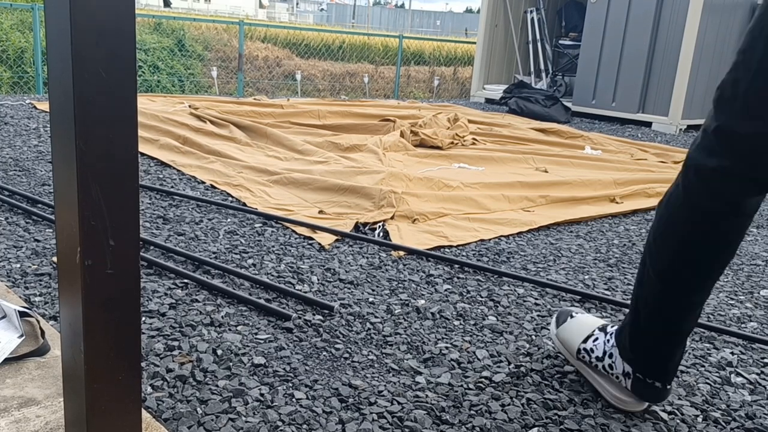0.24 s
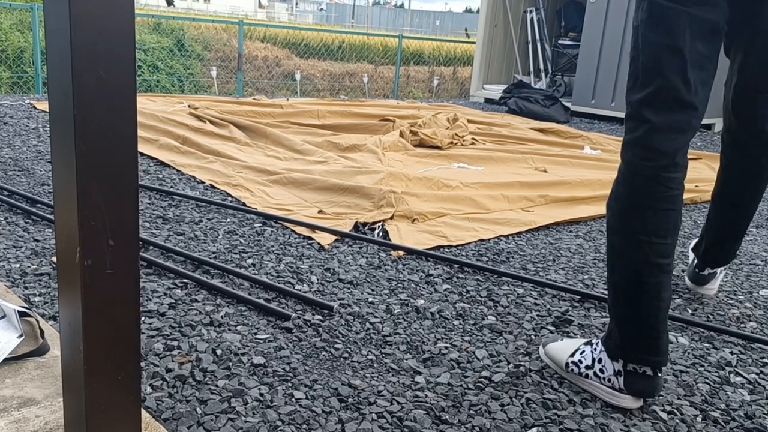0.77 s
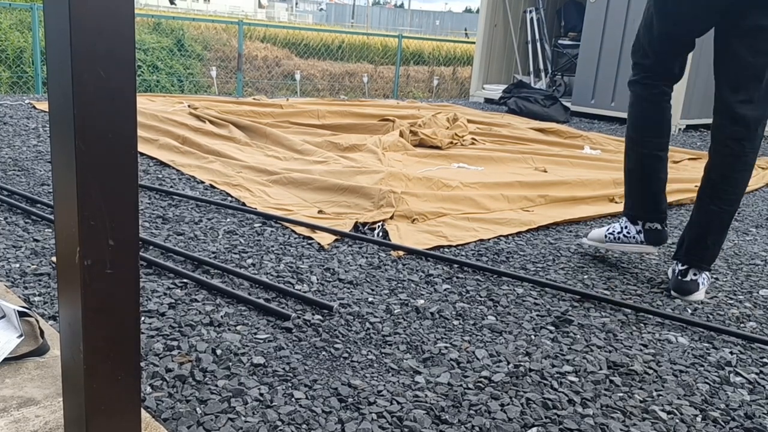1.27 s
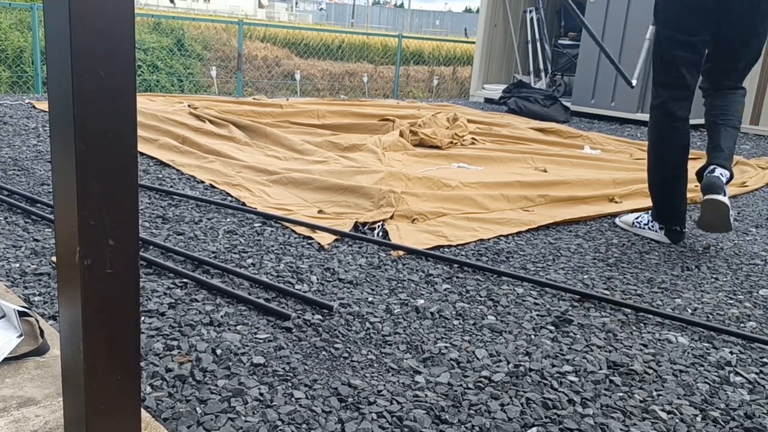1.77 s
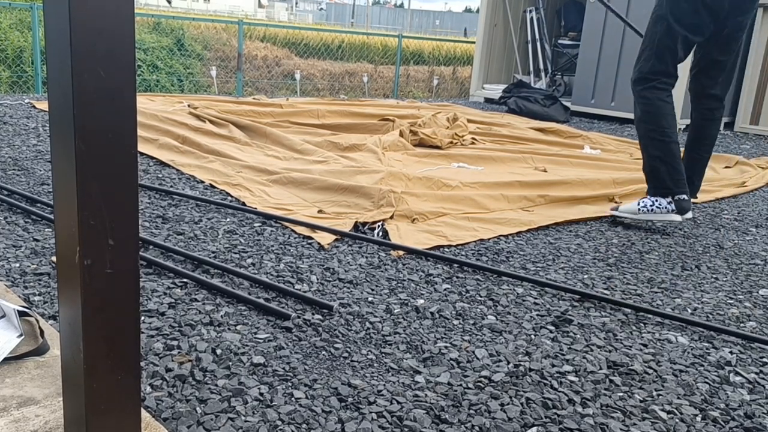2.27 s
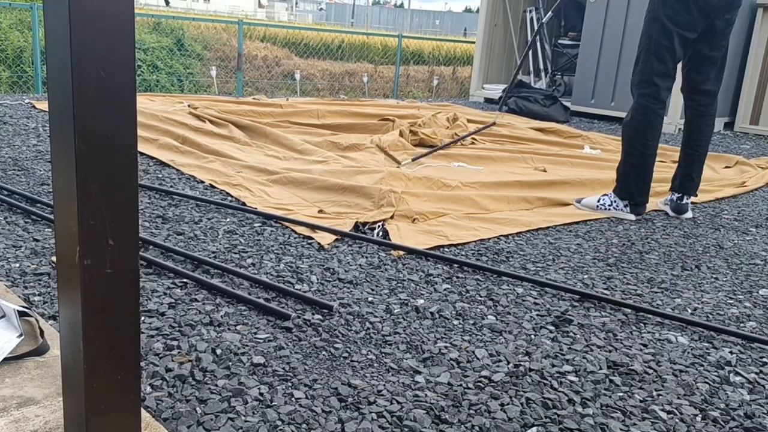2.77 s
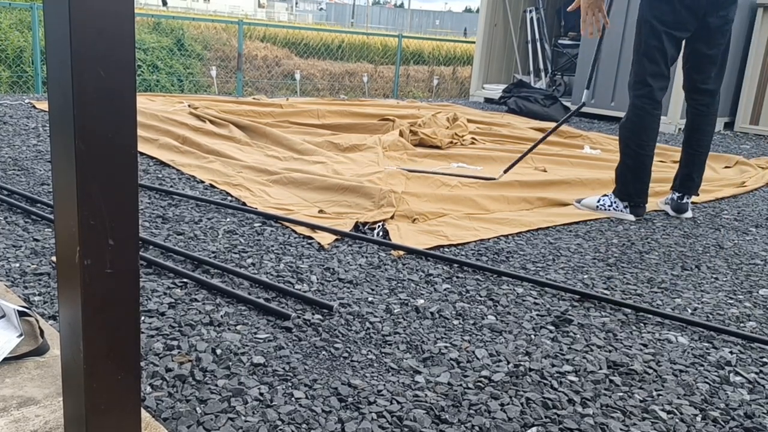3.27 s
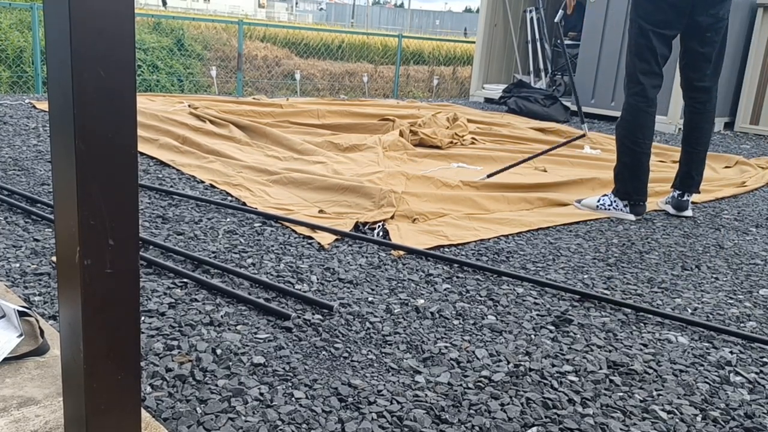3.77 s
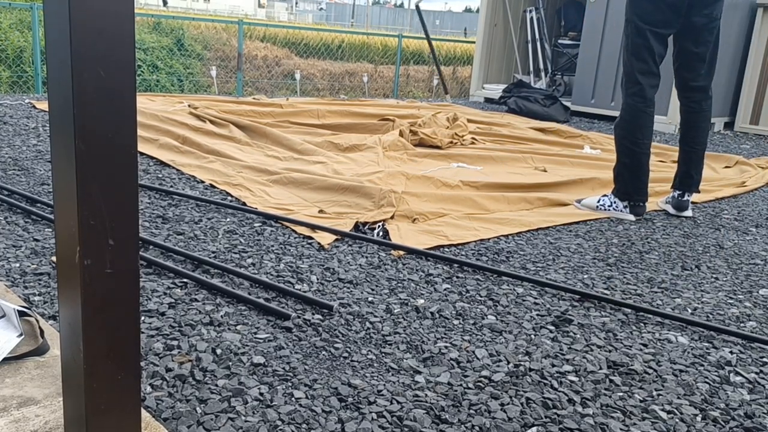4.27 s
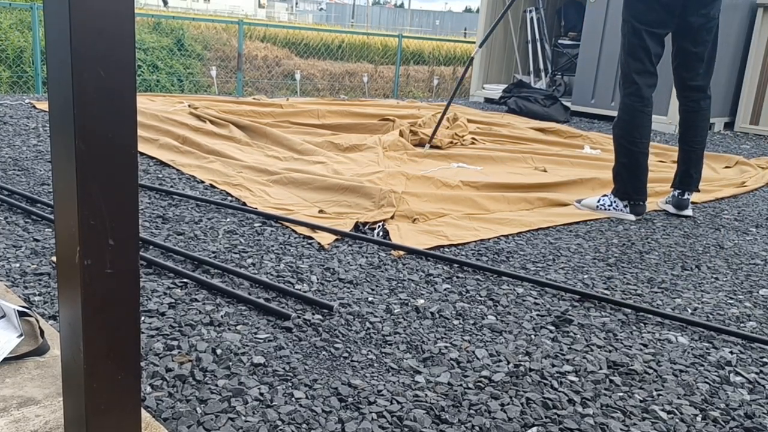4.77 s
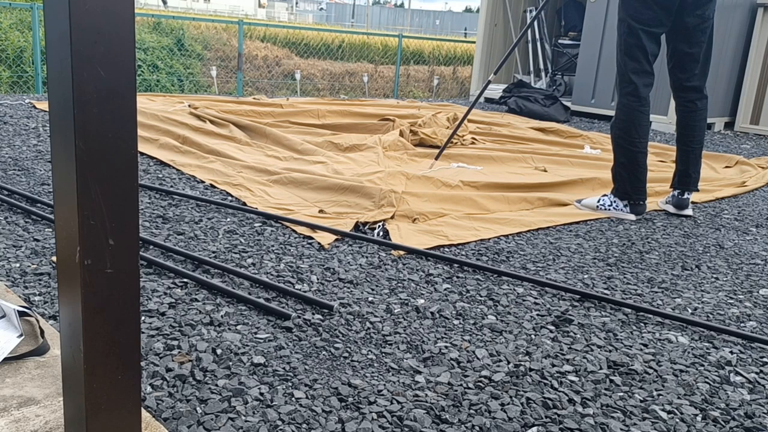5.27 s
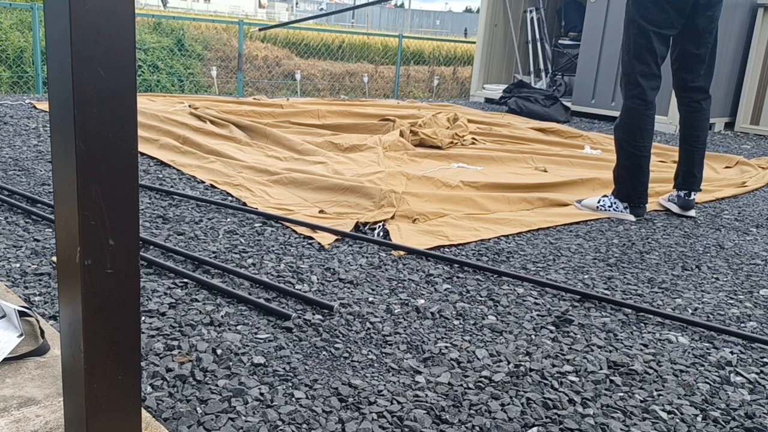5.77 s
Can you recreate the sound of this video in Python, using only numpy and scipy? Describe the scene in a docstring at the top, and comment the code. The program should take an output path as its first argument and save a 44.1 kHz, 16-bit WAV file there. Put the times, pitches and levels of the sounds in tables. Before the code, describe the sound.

Tent pole sections clack, rattle and briefly ring in an outdoor yard after a few light gravel steps, with a distant machine humming.

```python
"""Feet crunch and tick on gravel near the microphone, in a yard between sheds where a distant machine hums.
Further off, a folded tent pole is shaken out: its tube sections clack, rattle and ring briefly,
with a few dull thuds, and the walls throw each clack back as a short dense tail.
Gusts buffet the microphone ports, mostly the left, and the recorder turns down after the loudest blow."""
import sys
import numpy as np
from scipy import signal
from scipy.fft import rfft, irfft
from scipy.io import wavfile
from scipy.ndimage import uniform_filter1d

SR = 44100
rng = np.random.default_rng(int(sys.argv[2]) if len(sys.argv) > 2 else 0)


def persist_wave(psi):
    """Save psi, clipped to +-1, as 16-bit WAV."""
    counts = np.round(np.clip(psi, -1, 1) * 32767).astype(np.int16)
    wavfile.write(sys.argv[1], SR, np.atleast_2d(counts).T)


N = 265923


def amp(db):
    """Decibels to gain."""
    return 10 ** (np.asarray(db) / 20)


def rms_one(x):
    """Scale to unit rms."""
    return x / np.sqrt(np.mean(x ** 2) + 1e-20)


def at_hz(points, hz):
    """Read a table on a log-frequency axis."""
    points = np.array(points)
    return np.interp(np.log(hz), np.log(points[:, 0]), points[:, 1])


def band(x, low_hz, high_hz):
    """Butterworth band-pass."""
    sos = signal.butter(2, [low_hz, min(high_hz, SR / 2.2)], "band", fs=SR, output="sos")
    return signal.sosfilt(sos, x + 1e-18)


def causal_colour(spectrum):
    """Minimum-phase response of a spectrum, so that nothing sounds early; energy 1."""
    size = 4096
    hz = np.arange(size // 2 + 1) * SR / size + 1
    cepstrum = irfft(np.log(amp(at_hz(spectrum, hz))))
    cepstrum[1:size // 2] *= 2
    cepstrum[size // 2 + 1:] = 0
    response = irfft(np.exp(rfft(cepstrum)))
    return response / np.sqrt(np.sum(response ** 2))


def swell(peak_s, db, fall_s, rise_share):
    """Gain that climbs 20 dB in rise_share * fall_s to its peak, then drops 20 dB every fall_s."""
    since = np.arange(N) / SR - peak_s
    return amp(db - 20 * np.maximum(since, -since / rise_share) / fall_s)


def diffuse(shape):
    """White noise from all sides, alike at both microphones where the wavelength is long."""
    # left-right likeness of diffuse sound: frequency_hz, correlation
    likeness = [(60, 0.64), (250, 0.83), (600, 0.76), (1500, 0.054), (8000, 0.058)]
    mid, side = rfft(rng.standard_normal((2,) + shape))
    hz = np.arange(mid.shape[-1]) * SR / shape[-1] + 1
    alike = np.clip(at_hz(likeness, hz), 0, 1)
    mid, side = np.sqrt(1 + alike) * mid, np.sqrt(1 - alike) * side
    return irfft(np.array([mid + side, mid - side]), shape[-1])


def air_and_machine():
    """Far air and traffic, with the hum of a distant machine whose speed wanders a little."""
    # spectrum of the yard's air: frequency_hz, density_db
    air_spectrum = [(18, -42), (30, -23), (108, -4), (183, -7.5), (232, 1.5), (335, -3.5), (382, -5),
                    (471, -10.5), (645, -16.5), (775, -21), (1940, -29), (2460, -31.5), (4490, -36),
                    (8420, -33), (15800, -42.5)]
    hum_hz, harmonics = 76.76, [(1, -71), (2, -64.5), (3, -64.5), (5, -59.5)]   # multiple, level_db
    colour = causal_colour(air_spectrum)
    air = signal.fftconvolve(diffuse((N + SR,)), colour[None], axes=1)[:, SR:SR + N]
    wander = 0.0033 * np.cumsum(rng.standard_normal(N))
    phase = 2 * np.pi * hum_hz * np.arange(N) / SR + wander
    hum = sum(2 ** .5 * amp(db) * np.sin(k * phase) for k, db in harmonics)
    return amp(-53) * rms_one(air) + hum


def gravel():
    """Many stones grind under the sole: a dull crunch and a bright grit."""
    # weight shifts on the gravel: peak_s, crunch_db, fall_s, grit_offset_db
    treads = [(0.07, -63, 0.16, -8), (0.2, -61, 0.11, -8), (0.34, -39, 0.066, -4.5),
              (0.523, -62.5, 0.098, -2), (0.62, -82, 0.6, 8.5), (0.934, -55, 0.17, -9),
              (1.207, -65, 0.031, -25), (1.297, -73, 0.053, 20)]
    grains_per_s = 800
    slips = rng.random((2, N)) < grains_per_s / SR
    strength = amp(3.9 * np.minimum(rng.exponential(1, (2, N)), 5))
    grains = slips * strength * rng.choice([-1, 1], (2, N))
    crunch = rms_one(band(grains[0], 220, 2350))
    grit = rms_one(band(grains[1], 3000, 17000))
    return sum(swell(s, db, fall_s, rise_share=1) * (crunch + amp(grit_db + 1.5) * grit)
               for s, db, fall_s, grit_db in treads)


def ticks():
    """A stone under a sole or a joint snapping shut gives a millisecond of bright noise."""
    # sharp dry ticks: start_s, level_db, pitch_hz
    snaps = [(0.0556, -41.5, 5240), (0.2138, -41, 5300), (0.263, -44, 8380), (0.291, -45, 7650),
             (0.312, -34, 8500), (0.324, -43.5, 12700), (0.356, -39, 7500), (0.4255, -28, 7100),
             (0.437, -41, 14600), (0.447, -31, 14100), (0.8777, -40.5, 7100), (0.971, -40, 13100),
             (1.709, -26.5, 15000), (1.7234, -31, 11800), (1.8966, -29, 8600), (2.5723, -9, 11100),
             (2.7996, -9, 8310), (4.636, -19.5, 8100), (5.5217, -7.5, 7300)]
    length = SR // 100
    fade = np.exp(-np.arange(length) / SR / 0.0012)
    out = np.zeros(N)
    for s, db, hz in snaps:
        tick = band(rng.standard_normal(length) * fade, hz / 2.1, hz * 1.6)
        start = round(s * SR)
        out[start:start + length] += amp(db + 2.5) * tick / np.max(np.abs(tick))
    return out


def ring(force, hz, t60):
    """One mode driven by a force; gain 1 at resonance."""
    r = amp(-60 / (t60 * SR))
    feedback = [1, -2 * r * np.cos(2 * np.pi * hz / SR), r * r]
    return signal.lfilter([(1 - r * r) / 2, 0, (r * r - 1) / 2], feedback, force + 1e-18)


def tent_pole():
    """Each knock is a burst of uneven contacts that drives a broad clack and the tube's modes."""
    # sections knocking together: start_s, clack_db, ring_db, hardness_db (gain per mode group upward),
    # lowest_mode_db (often damped by a hand or the cord), rattle_s
    knocks = [(0.4614, -46, -59, -5.5, -57, 0.016), (0.537, -34, -51.5, -4, -53, 0.011),
              (0.6629, -40, -57.5, -4.5, -60, 0.0078), (1.2315, -46, -71, -1, -76, 0.0052),
              (1.2767, -36.5, -65, -7, -59, 0.0031), (1.4327, -25, -43.5, -2, -45, 0.0076),
              (1.558, -17, -36, -0.5, -46, 0.0025), (1.7566, -39, -57.5, -0.5, -80, 0.0023),
              (1.9151, -20, -38, 3, -41, 0.0061), (2.026, -56, -60, -1, -35, 0.019),
              (2.0484, -45.5, -53, -5.5, -42.5, 0.028), (2.2097, -63, -55, 1, -40, 0.011),
              (2.2304, -46, -54.5, -4, -50, 0.013), (2.39, -19, -34.5, 3, -54.5, 0.012),
              (2.5695, -20.5, -40, -4, -49.5, 0.0034), (2.684, -37, -52, -1, -60.5, 0.015),
              (2.7316, -31.5, -53, -6, -55.5, 0.0063), (2.7761, -16, -31, 2, -34, 0.012),
              (2.7987, -6.5, -31, 6.5, -37.5, 0.0092), (2.8328, -13, -28, 3, -67, 0.0036),
              (3.0505, -46, -63, -5, -69, 0.0054), (3.1904, -48, -63, 1.5, -84, 0.01),
              (3.457, -47.5, -60, -0.5, -79, 0.013), (3.568, -63, -61, 1, -81, 0.01),
              (3.6506, -38, -44.5, -1, -72, 0.018), (3.6707, -18, -52, 5.5, -75, 0.0035),
              (3.7967, -43, -52.5, -5.5, -38, 0.0029), (3.827, -33.5, -40, -2.5, -42, 0.0066),
              (3.8584, -27, -42.5, 3, -70, 0.0048), (4.1066, -59.5, -61, 1.5, -68, 0.0025),
              (4.156, -68, -72, -6.5, -68, 0.0065), (4.2971, -30, -47.5, -1, -66, 0.013),
              (4.4435, -34, -63, 0, -52, 0.008), (4.489, -37.5, -60, 2, -57, 0.027),
              (4.5296, -32, -42.5, -0.5, -65, 0.0019), (4.5804, -37.5, -45, -2, -45, 0.002),
              (4.637, -14.5, -35, 3.5, -53, 0.0027), (4.697, -43, -52, -4.5, -48, 0.005),
              (4.842, -42, -47.5, -4, -50, 0.0019), (4.9117, -47, -56.5, -2.5, -52, 0.013),
              (5.1114, -51, -51.5, -4.5, -48, 0.017), (5.1365, -34, -46, -2, -52, 0.0068),
              (5.1619, -36, -59, 4.5, -55, 0.0091), (5.206, -35.5, -58, 2, -74, 0.0047),
              (5.2294, -54, -66, -1.5, -73, 0.0071), (5.5212, -17.5, -30, 2, -52, 0.012),
              (5.7677, -49, -80, 0, -62, 0.0067)]
    # bending modes in groups, split as the sections differ slightly and damped by the cord inside:
    # pitch_hz, level_db, t60_s
    tube_modes = [
        [(1218, 5.5, 0.037)],
        [(2160, 1, 0.036), (2334, 0, 0.0097), (3254, -5, 0.0062), (3487, 0, .012)],
        [(5050, 0, 0.013), (5190, -1, 0.012)],
        [(7250, 0.5, 0.024), (7020, -4, 0.0093)],
        [(8190, 5.5, 0.035), (8335, 2.5, 0.015), (9070, -8, 0.027)],
    ]
    # spectrum of the clack: frequency_hz, density_db
    clack_spectrum = [(290, -19), (500, -28.5), (986, -16), (2250, -1.5), (4690, 3.5), (5190, 9),
                      (6180, -18), (6830, -2.5), (7670, -10.5), (8490, -2.5), (9390, -6), (15100, -9),
                      (15800, -15.5)]
    length, upper_groups = SR // 5, len(tube_modes) - 1
    t = np.arange(length) / SR
    shape = (len(knocks), length)
    contacts = rng.standard_normal(shape) * amp(3.6 * rng.exponential(1, shape))
    # each knock lands elsewhere on the tube and favours other modes
    scatter_db = 4.5 * rng.standard_normal((len(knocks), upper_groups))
    rank = np.arange(upper_groups) - 1.5
    force = np.zeros((2 + len(tube_modes), N + length))
    for knock, touch, chance_db in zip(knocks, contacts, scatter_db):
        s, clack_db, ring_db, hardness_db, lowest_db, rattle_s = knock
        age = t / rattle_s
        burst = touch * (1 - np.exp(-4 * age)) * np.exp(-age)   # long rattles also start softly
        burst /= np.sqrt(np.sum(burst ** 2))
        treble_db = clack_db + 0.4 * hardness_db   # hard knocks brighten the clack too
        upper_db = ring_db + hardness_db * rank + chance_db
        start = round(s * SR)
        force[:, start:start + length] += amp([clack_db, treble_db, lowest_db, *upper_db])[:, None] * burst
    body, treble, *drives = force[:, :N]
    broad = amp(19) * band(body, 274, 6700) + amp(21.5) * band(treble, 5570, 20000)
    clack = signal.fftconvolve(broad, causal_colour(clack_spectrum))[:N]
    rings = sum(amp(db) * ring(drive, hz, t60)
                for drive, modes in zip(drives, tube_modes) for hz, db, t60 in modes)
    return clack + amp(34.5) * rings


def thuds():
    """A soft landing, as of a pole end on a tarp: low noise around a pitch, dying fast."""
    # dull knocks: start_s, level_db, pitch_hz, t60_s
    landings = [(1.561, -34, 940, 0.015), (2.77, -29.5, 545.6, 0.038), (2.783, -29, 397, 0.091),
                (2.812, -23.5, 354, 0.073), (4.635, -46, 950, 0.0048), (5.52, -35, 1022, 0.015),
                (5.748, -41.5, 1483, 0.023)]
    out, t = np.zeros(N), np.arange(N) / SR
    for s, db, hz, t60 in landings:
        noise = rms_one(band(rng.standard_normal(N), hz / 1.48, hz * 1.29))
        since = np.maximum(t - s, 0)
        out += noise * (t >= s) * amp(db - 1 - 60 * since / t60)
    return out


def wind():
    """Low lumpy pressure on the microphone ports, unrelated in the two and stronger on the left."""
    # gusts on the ports: peak_s, level_db, fall_s
    gusts = [(2.257, -35, 0.023), (2.423, -28, 0.035), (2.52, -36.5, 0.052), (2.637, -44.5, 0.059),
             (2.813, -51.5, 0.17), (4.968, -60, 0.15), (5.194, -58, 0.04), (5.363, -63.5, 0.06),
             (5.63, -52, 0.22), (5.887, -42, 0.04)]
    rumble = band(rng.standard_normal((2, N)), 52, 140)
    lumps = rms_one(band(rumble, 50, 160))
    blowing = sum(swell(*gust, rise_share=0.9) for gust in gusts)
    return blowing * lumps * amp([[3], [-5]])


def yard(x, direct_db, tail_db, early_db, right_db):
    """Direct sound, then a dense tail off the sheds; the reflections change as the source moves."""
    # decay of the yard's reflections: frequency_hz, t60_s
    decay = [(500, 0.52), (1500, 0.35), (4000, 0.32), (10000, 0.26)]
    hop, left_lag_samples = SR // 4, 4
    t, count = np.arange(2 * hop) / SR, N // hop + 2
    white = diffuse((count, 2 * hop))
    tails = sum(band(white, hz / 2 ** .5, hz * 2 ** .5) * amp(-60 * t / at_hz(decay, hz)) * (-1) ** k
                for k, hz in enumerate(125 * 2. ** np.arange(8)))
    onset = 1 - np.exp(-t / 0.0011)
    early = 1 + amp(early_db) * np.exp(-t / 0.012)   # ground and near walls answer first and strongest
    tails *= onset * early
    tails *= amp(tail_db) / np.sqrt(np.sum(tails ** 2) / 2 / count)
    window = np.sin(np.pi * t * SR / hop / 2)
    padded, wet = np.pad(x, (hop, 3 * hop)), np.zeros((2, N + 8 * hop))
    for k in range(count):   # overlapping stretches, each with its own reflections
        stretch = padded[k * hop:(k + 2) * hop] * window
        wet[:, k * hop:(k + 4) * hop - 1] += signal.fftconvolve(stretch[None], tails[:, k], axes=1)
    direct = amp(direct_db) * np.array([np.roll(x, left_lag_samples), x])
    return (direct + wet[:, hop:hop + N]) * amp([[-right_db], [right_db]])


def scene():
    """The pole is far off and wet, its thuds less wet; steps and ticks are nearer and further right."""
    landings = yard(thuds(), direct_db=-0.5, tail_db=-2.5, early_db=5, right_db=1.3)
    pole = yard(tent_pole(), direct_db=-3.5, tail_db=3, early_db=-4.5, right_db=0.92)
    steps = yard(gravel() + ticks(), direct_db=-4.5, tail_db=-7, early_db=3.5, right_db=3.5)
    return landings + pole + steps + air_and_machine() + wind()


def record(dry):
    """The recorder's gain control turns down above a threshold and recovers slowly; rumble and top are cut."""
    threshold_db, cut_share, recovery_db_per_s, smoothing_s = -26, 0.27, 2, 0.1
    power = uniform_filter1d(np.mean(dry ** 2, axis=0), 880)
    wanted_db = cut_share * np.maximum(10 * np.log10(power + 1e-12) - threshold_db, 0)
    recovery_db = recovery_db_per_s * np.arange(N) / SR
    held_db = np.maximum.accumulate(wanted_db + recovery_db) - recovery_db
    smooth = np.exp(-1 / (smoothing_s * SR))
    cut_db = signal.lfilter([1 - smooth], [1, -smooth], np.maximum(held_db, 0))
    low_cut = signal.butter(4, 48, "high", fs=SR, output="sos")
    high_cut = signal.cheby2(24, 75, 16400, fs=SR, output="sos")
    return signal.sosfilt(high_cut, signal.sosfilt(low_cut, dry * amp(-cut_db)))


dry = scene()
out = record(dry)
persist_wave(out)
```